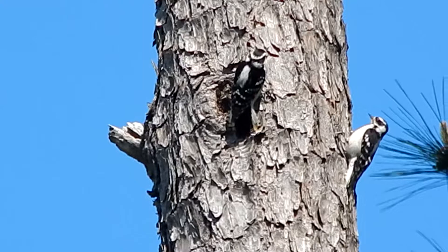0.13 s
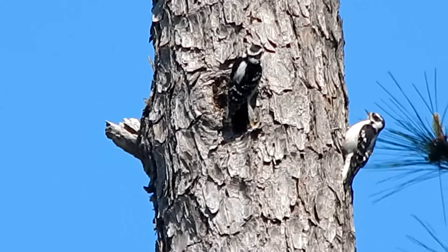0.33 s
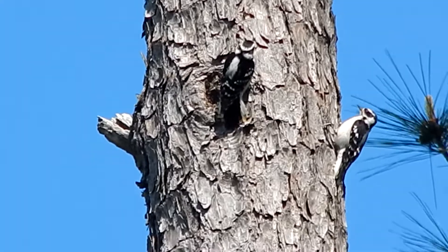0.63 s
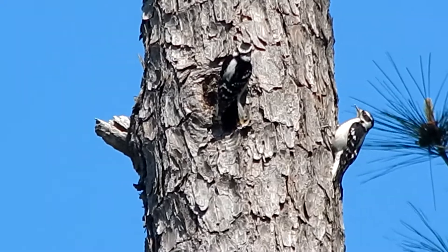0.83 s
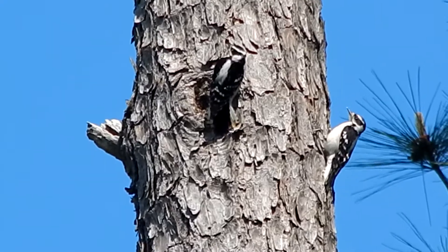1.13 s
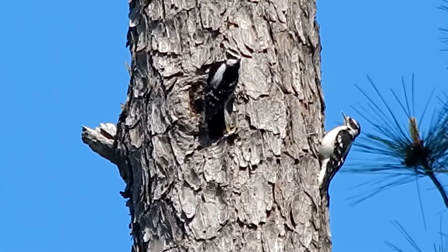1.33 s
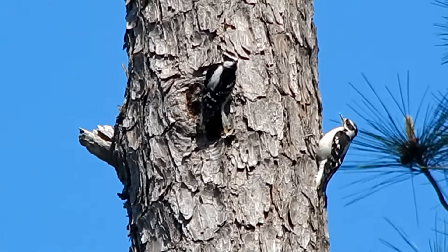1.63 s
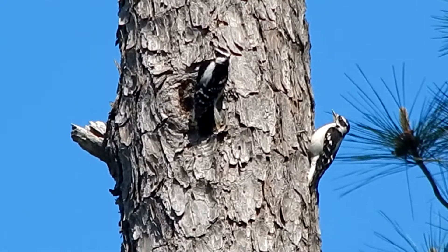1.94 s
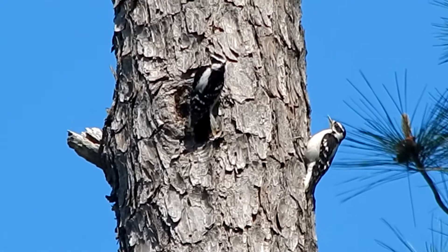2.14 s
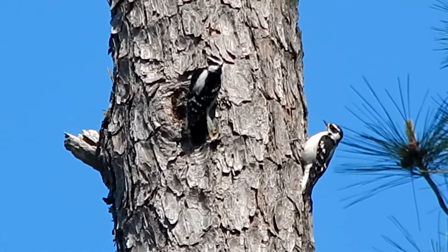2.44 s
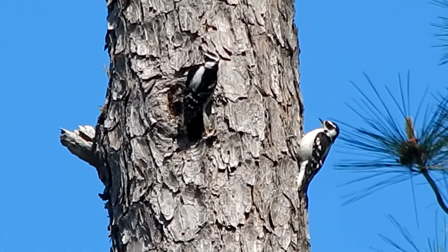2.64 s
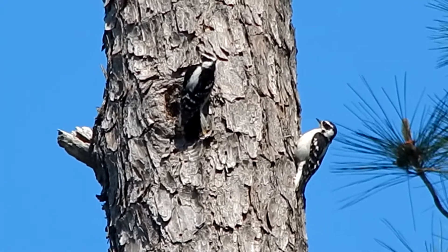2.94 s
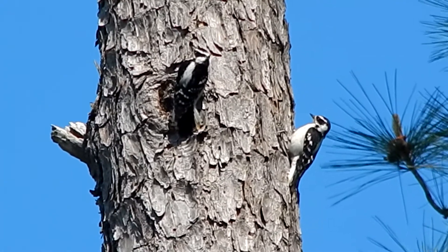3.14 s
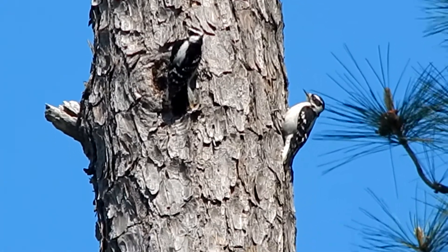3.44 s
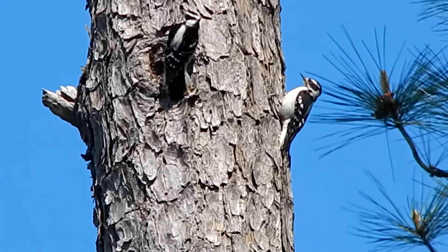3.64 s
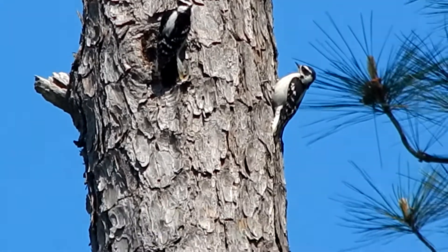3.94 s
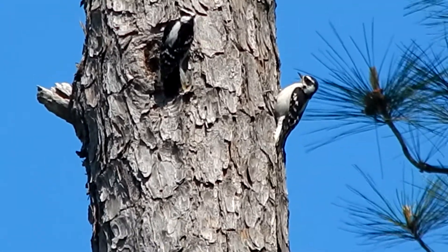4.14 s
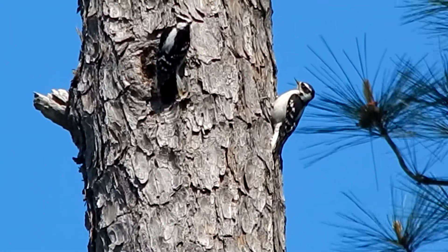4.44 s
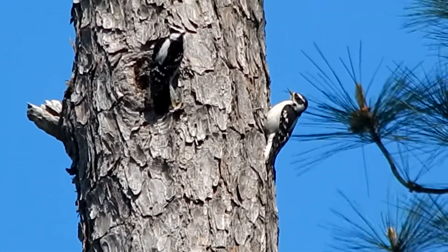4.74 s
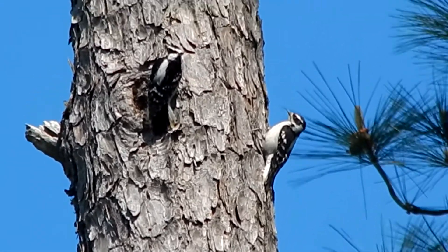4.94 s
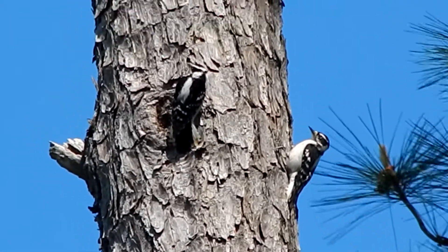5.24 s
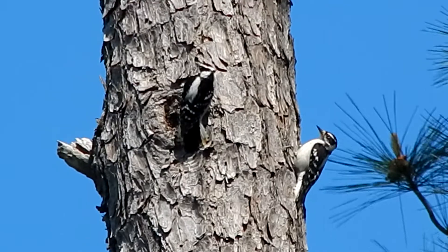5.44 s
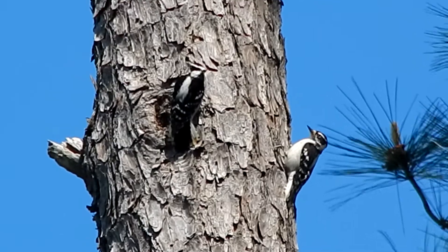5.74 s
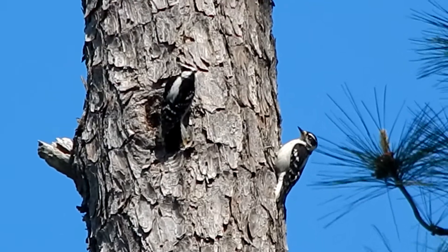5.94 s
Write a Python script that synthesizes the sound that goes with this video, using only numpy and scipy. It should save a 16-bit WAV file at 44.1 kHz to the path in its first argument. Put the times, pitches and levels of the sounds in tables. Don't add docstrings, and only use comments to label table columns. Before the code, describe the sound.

Far birds twitter on the left, then a nearer bird gives three pure descending whistles and about fourteen evenly spaced chips, each note ringing briefly among the trunks. Low, lumpy wind gusts knock at the microphone, especially on its left side as the chips begin. Afterwards come only scattered distant notes, one bright chirp, soft needle rustle, tiny twig ticks and a steady low rumble of traffic.

```python
import sys
import numpy as np
from scipy import signal
from scipy.fft import rfft, irfft, next_fast_len
from scipy.io import wavfile
from scipy.ndimage import uniform_filter1d

SR = 44100
rng = np.random.default_rng(int(sys.argv[2]) if len(sys.argv) > 2 else 0)


def volts_from_decibels(level):
    exponent = np.asarray(level, float) / 20
    return 10 ** exponent


def wav_out(sig):
    wavfile.write(sys.argv[1], SR, np.round(np.clip(np.atleast_2d(sig).T, -1, 1) * 32767).astype(np.int16))


N = 267819

# t/s from its start, f/Hz
WHISTLE_PITCH = [
    (0, 3560),
    (.08, 3310),
    (.11, 3365),
    (.155, 3215),
    (.172, 3060),
    (.2, 2650),
    (.248, 2050),
    (.334, 1880),
    (.49, 1590),
]
# t/s from its start, level/dB
WHISTLE_EFFORT = [(0, -32), (.006, -9), (.05, 2), (.09, -1), (.15, 0.5), (.193, 10), (.228, -3), (.29, -1),
                  (.49, -6)]
# t/s, level/dB, stretch after the bend [ratio], tilt of the shelf f/Hz
WHISTLES = [
    (0.624, -53.5, 1.13, 95),
    (1.543, -46, 1.06, 10),
    (2.265, -46, 0.99, 0),
]
# t/s from its start, f/Hz
CHIP_PITCH = [
    (-.003, 9000),
    (.003, 8100),
    (.0095, 4800),
    (.014, 4330),
    (.042, 3320),
    (.047, 2900),
    (.052, 2200),
    (.058, 1800),
    (.072, 1500),
]
# t/s from its start, level/dB about its section
CHIP_EFFORT = [(-.003, -20), (.002, -5), (.009, 2), (.012, -6), (.025, -11), (.03, .6), (.047, .6),
               (.053, -3.5), (.072, -12)]
# t/s, pace [ratio], level/dB of the high drop, of the middle slide, of the low end
CHIPS = [(2.9102, 1.004, -58, -43, -49), (3.0454, .984, -60, -46.5, -46), (3.1822, 1.004, -59, -45, -46),
         (3.3234, .974, -62, -44, -48), (3.4589, 1.065, -56, -43, -49), (3.6002, 1.004, -55, -42, -47),
         (3.7464, .984, -55, -40, -46), (3.8881, .953, -56, -41, -46), (4.0243, .994, -54, -42, -45),
         (4.1668, .994, -54, -40, -44), (4.3057, 1.014, -55, -42, -43), (4.4456, 1.025, -56, -42, -44),
         (4.5902, 1.014, -59, -40, -44), (4.7348, .994, -58, -41, -45)]
# multiple of the pitch, level/dB
OVERTONES = [(2, -21), (3, -35), (4, -19), (6, -28)]
# f/Hz, width f/Hz, level/dB
BEAK = [(8150, 650, 0), (12300, 700, -10)]
# f/Hz, left-right level/dB
EAR_TILT = [(1700, 1.5), (2500, -3), (3300, -5), (6000, -7)]

# t/s from its start, length t/s, from f/Hz, to f/Hz, level/dB
FAR_PHRASE = [
    (0, .024, 3750, 2750, -2),
    (.04, .02, 2500, 3250, -2),
    (.06, .026, 2520, 2950, 0),
]
# t/s, level/dB
FAR_PHRASE_TIMES = [
    (.285, -61),
    (.432, -54.5),
    (0.581, -54),
    (0.734, -63),
    (.885, -54),
]
# t/s, length t/s, from f/Hz, to f/Hz, level/dB
FAR_NOTES = [(1.16, .16, 3100, 2150, -56), (1.40, .06, 2600, 2050, -55), (1.48, .03, 3500, 3000, -60),
             (1.52, .06, 2600, 2000, -57), (1.68, .04, 2400, 2200, -59), (2.15, .05, 3400, 3250, -64),
             (2.33, .05, 2700, 2200, -61), (2.41, .05, 2400, 2450, -62), (2.57, .07, 3280, 3380, -58),
             (2.66, .07, 3350, 3300, -62), (2.76, .05, 2750, 2300, -61), (2.89, .04, 2400, 2700, -61),
             (3.19, .04, 3500, 2800, -56), (3.30, .07, 1900, 2200, -59), (3.40, .08, 2900, 2500, -61),
             (3.96, .08, 3100, 2700, -59), (5.07, .04, 1950, 2050, -57), (5.165, .09, 3150, 2500, -60),
             (5.25, .04, 2230, 2300, -61), (5.46, .04, 2600, 2750, -60), (5.72, .08, 2950, 2800, -63),
             (5.82, .05, 1900, 2150, -55), (5.93, .05, 3000, 2750, -61)]
# t/s, f/Hz, level/dB
CHIRP_UP = [
    (5.288, 1996, -63),
    (5.30, 2240, -53),
    (5.324, 2500, -58),
    (5.35, 2666, -40.5),
    (5.364, 2700, -52),
    (5.377, 2910, -38.5),
    (5.382, 3860, -46),
    (5.385, 4470, -49),
    (5.388, 5300, -66),
]
# t/s, f/Hz, level/dB
CHIRP_DOWN = [
    (5.378, 2950, -65),
    (5.385, 2550, -52),
    (5.392, 2340, -51),
    (5.408, 2260, -45),
    (5.417, 2050, -50),
    (5.424, 1850, -70),
]

# f/Hz, t60 t/s, level/dB
TRUNK_SCATTER = [(1770, 0.9, 2.5), (2500, 0.63, 2.5), (4000, 0.63, 0.7), (7200, 0.24, 11.5)]

# f/Hz, level/dB per Hz
NEEDLE_COLOUR = [(1500, -15), (4000, 2), (7000, 1), (10500, 3.3), (13000, 0.5), (15500, -14.5)]
# peak t/s, level/dB, swell t/s
PUFFS = [(1.56, -79.5, 0.012), (2.29, -76.5, 0.031), (2.94, -75, 0.014), (3.59, -77, 0.3), (4.37, -82, .3),
         (4.47, -79, 0.028), (4.92, -73.5, 0.52), (5.11, -86, 0.044), (5.39, -71.5, 0.065),
         (5.55, -77, 0.039), (5.79, -74, 0.039), (5.94, -72, 0.016), (6.05, -70, .04)]
# t/s, peak level/dB, left-right level/dB
TWIG_TICKS = [
    (4.1364, -52, -4.5),
    (4.8004, -47, -5),
    (4.8364, -47, -8.0),
    (4.8943, -51, -24),
    (5.5458, -49, -8.0),
    (5.7768, -47, -11),
    (5.9299, -47, 18),
]

# t/s, left level/dB, right level/dB
GUSTS = [(0, -58, -68), (.62, -62, -60), (.8, -41, -36), (1.0, -70, -53), (2.3, -66, -53),
         (2.471, -44.5, -50), (2.72, -35, -47), (2.98, -30.5, -39), (3.2, -37.5, -60), (3.35, -26, -62),
         (3.47, -55, -36), (3.6, -35.5, -39.5), (3.72, -25, -32), (3.98, -33.5, -44.5), (4.1, -47, -48),
         (4.35, -46, -54), (4.72, -40.5, -47), (4.85, -56, -60)]
# f/Hz, level/dB per Hz
BUFFET_COLOUR = [(12, -59), (20, -12.5), (49, 2), (92, -4.5), (151, -11), (357, -34), (387, -26),
                 (500, -55), (650, -83), (1100, -120)]
# t/s, peak level/dB, push 1 or pull -1, f/Hz
EDDIES_LEFT = [(0.753, -19, 1, 77), (0.771, -18, 1, 63), (0.7901, -16, 1, 95), (2.5215, -17, 1, 76.4),
               (2.779, -16, 1, 115), (2.888, -27, 1, 97), (2.974, -14.5, -1, 95), (3.0157, -14.5, -1, 94),
               (3.33, -20, 1, 109), (3.361, -19.5, 1, 85), (3.4169, -18.5, -1, 88), (3.463, -18, -1, 92),
               (3.4858, -4.5, 1, 121), (3.5383, -16, -1, 73), (3.7482, -19, -1, 86), (3.7753, -16, 1, 125),
               (3.8267, -20.5, 1, 93), (3.8603, -16, -1, 72.5), (3.896, -17.5, 1, 81), (3.937, -21, 1, 61),
               (3.9933, -22, 1, 70), (4.0354, -20, -1, 117)]
# t/s, peak level/dB, push 1 or pull -1, f/Hz
EDDIES_RIGHT = [
    (3.5194, -21, 1, 64),
    (3.5868, -20, -1, 75),
    (3.6696, -18, 1, 69),
    (3.7118, -27, -1, 104),
    (3.7354, -33, 1, 78),
]

# f/Hz, level/dB per Hz
AIR_COLOUR = [(22, -8.5), (50, -1.5), (115, 0.57), (160, -5.5), (250, -8.5), (500, -14), (800, -15),
              (1300, -20.5), (2000, -23.5), (2900, -26), (4200, -31.5), (5600, -36), (11500, -40.5),
              (15500, -45.5)]
# f/Hz, left-right correlation [-1..1]
AIR_LIKENESS = [(60, 1), (180, 0.95), (550, 0.79), (1650, 0.33), (4970, -0.33), (15000, 0.097)]
# f/Hz, left-right level/dB
AIR_LEAN = [(60, 2), (240, 1.5), (950, 0.92), (3770, -1.9), (15000, -0.26)]

# f/Hz, width f/Hz
NOTCHES = [
    (2497, 35),
    (7500, 90),
]


def singer():
    song = whistles() + chips()
    own_twinkle = np.array([drift(40), drift(40)])
    return song * volts_from_decibels(1.3 * drift(45) + 1.3 * own_twinkle)


def whistles():
    drop_hz, drop_s = 4800, .0058
    bend_s, release_s = .2, .02
    out = np.zeros((2, N))
    t, hz, db = learned(WHISTLE_PITCH, WHISTLE_EFFORT)
    hz = hz + drop_hz / (1 + (t / drop_s) ** 2)
    rounded = uniform_filter1d(hz, size=15, mode="nearest")
    hz = np.where(t > .05, rounded, hz)
    db = db - 15 * np.clip(1 - (t[-1] - t) / release_s, 0, 1)
    for s, level_db, stretch, tilt_hz in WHISTLES:
        tilted = hz + tilt_hz * np.sin(2 * np.pi * np.minimum(t / (1.1 * bend_s), 1))
        drawn_out = np.minimum(t, bend_s) + stretch * np.maximum(t - bend_s, 0)
        sing(out, np.transpose([s + drawn_out, tilted, level_db + db]), 0.1, OVERTONES, BEAK)
    return out * volts_from_decibels(2.3 * drift(30))


def chips():
    pan_db, head_turn_db = -1.5, 0.8
    out = np.zeros((2, N))
    t, hz, db = learned(CHIP_PITCH, CHIP_EFFORT)
    rounded = uniform_filter1d(hz, size=5, mode="nearest")
    hz = np.where(t > .02, rounded, hz)
    turns = rng.standard_normal(len(CHIPS))
    for (s, pace, *sections_db), turn in zip(CHIPS, turns):
        level_db = db + 0.1 + np.interp(t, [.006, .036, .053], sections_db)
        sing(out, np.transpose([s + pace * t, hz, level_db]), pan_db + head_turn_db * turn, OVERTONES, BEAK)
    return out


def learned(pitch, effort):
    s = np.arange(pitch[0][0], pitch[-1][0], .001)
    pitch_s, hz = np.transpose(pitch)
    effort_s, db = np.transpose(effort)
    return s, np.exp(np.interp(s, pitch_s, np.log(hz))), np.interp(s, effort_s, db)


def sing(out, rows, pan_db, overtones, beak):
    s, hz, level_db = np.transpose(rows)
    i = np.arange(int(s[0] * SR), int(s[-1] * SR))
    glided = np.exp(np.interp(i / SR, s, np.log(hz)))
    hz = uniform_filter1d(glided, size=64, mode="nearest")
    phase = 2 * np.pi * (np.cumsum(hz) / SR + rng.random())
    tone = np.sin(phase)
    for multiple, share_db in overtones:
        overtone_hz = multiple * hz
        opening = 0
        for centre_hz, width_hz, top_db in beak:
            opening = opening + volts_from_decibels(top_db) / (1 + ((overtone_hz - centre_hz) / (width_hz / 2)) ** 2)
        audible = overtone_hz < SR / 2
        tone = tone + volts_from_decibels(share_db) * opening * audible * np.sin(multiple * phase)
    fade = np.clip(np.minimum(i - i[0], i[-1] - i) / 90, 0, 1)
    level = np.sqrt(2) * volts_from_decibels(np.interp(i / SR, s, level_db))
    out[:, i] += level * fade * tone * sides(pan_db + at_hz(EAR_TILT, hz))


def neighbours():
    pan_db, spread_db = 8, 1.8
    far, near = np.zeros((2, N)), np.zeros((2, N))
    for s, level_db in FAR_PHRASE_TIMES:
        for after, length, from_hz, to_hz, note_db in FAR_PHRASE:
            sing(far, glide(s + after, length, from_hz, to_hz, level_db + note_db), 11, [], [])
    places = rng.standard_normal(len(FAR_NOTES))
    for note, place in zip(FAR_NOTES, places):
        sing(far, glide(*note), pan_db + spread_db * place, [], [])
    for voice in CHIRP_UP, CHIRP_DOWN:
        sing(near, voice, 1.5, [(2, -13), (3, -21)], [(4400, 800, 0), (8000, 1800, -5)])
    blur = rng.standard_normal((2, 900)) * np.hanning(900) / 45
    far = .8 * far + 1.05 * signal.fftconvolve(far, blur, axes=1)[:, :N]
    return far * volts_from_decibels(2.5 * drift(88)), near


def glide(s, length, from_hz, to_hz, level_db):
    part = np.array([0, .25, .75, 1])
    hz = from_hz * (to_hz / from_hz) ** part
    return np.transpose([s + length * part, hz, level_db - 14 * np.array([1, 0, 0, 1])])


def woods(x):
    t = np.arange(SR) / SR
    tail = 0
    for hz, t60, level_db in TRUNK_SCATTER:
        band = signal.butter(2, [hz / 1.25, hz * 1.25], "band", fs=SR, output="sos")
        noise = signal.sosfilt(band, rng.standard_normal((2, SR)))
        tail = tail + noise * volts_from_decibels(level_db - 60 * t / t60)
    clumps = volts_from_decibels([1.5 * drift(25, count=SR) for side in range(2)])
    tail = tail * np.clip(t / .008, 0, 1) * clumps
    tail = tail / np.sqrt(np.sum(tail ** 2) / 2)
    return signal.fftconvolve(x.mean(axis=0, keepdims=True), tail, axes=1)[:, :N]


def needles():
    grain_db = 1.7 * np.minimum(rng.exponential(1, (2, N)), 5)
    grains = rng.standard_normal((2, N)) * volts_from_decibels(grain_db)
    out = coloured(NEEDLE_COLOUR, grains) * breeze() * volts_from_decibels(9.0 + 2.44 * drift(20.5)) * sides(-15.0)[:, None]
    die_away = volts_from_decibels(-60 * np.arange(200) / SR / 0.0091)
    for s, peak_db, pan_db in TWIG_TICKS:
        snap = coloured(NEEDLE_COLOUR, rng.standard_normal(N))[:200] * die_away
        at = int(s * SR)
        out[:, at:at + 200] += volts_from_decibels(peak_db - 4.5) * snap * sides(pan_db)[:, None]
    return out


def breeze():
    stir_db, grows_db_per_s, puff_dies_s = -83.5, 0.5, 0.05
    t = np.arange(N) / SR
    power = volts_from_decibels(stir_db + grows_db_per_s * t) ** 2
    for s, db, swell_s in PUFFS:
        power = power + volts_from_decibels(db) ** 2 * np.exp(-np.abs(t - s) / np.where(t < s, swell_s, puff_dies_s))
    return np.sqrt(power)


def wind():
    s, *levels = np.transpose(GUSTS)
    t = np.arange(N) / SR
    gust_db = [np.interp(t, s, level) + 3.3 * np.clip(drift(22.4), -2, 1.5) for level in levels]
    out = volts_from_decibels(gust_db) * coloured(BUFFET_COLOUR, rng.standard_normal((2, N)))
    for port, eddies in enumerate([EDDIES_LEFT, EDDIES_RIGHT]):
        for s, peak_db, push, hz in eddies:
            swing = eddy(hz)
            at = int((s - .03) * SR)
            out[port, at:at + len(swing)] += np.sign(push) * volts_from_decibels(peak_db - 3.5) * swing
    return out


def eddy(hz):
    t = np.arange(-.03, .05, 1 / SR)
    width = np.where(t < 0, .28, .75) / hz
    cycles = np.where(t < 0, hz * t, np.log1p(0.93 * hz * np.abs(t)) / 0.85)
    return np.cos(2 * np.pi * cycles) * np.exp(-(t / width) ** 2 / 2)


def open_air():
    size = next_fast_len(N)
    hz = np.fft.rfftfreq(size, 1 / SR)
    mid, side = rfft(rng.standard_normal((2, size)))
    alike = np.clip(at_hz(AIR_LIKENESS, hz), -1, 1)
    pair = np.sqrt(1 + alike) * mid + np.sqrt(1 - alike) * side * [[1], [-1]]
    noise = irfft(pair * sides(at_hz(AIR_LEAN, hz)), size)[:, :N]
    return volts_from_decibels(-44.05 + 1.25 * drift(7.2)) * coloured(AIR_COLOUR, noise)


def at_hz(points, hz):
    p = np.array(points)
    return np.interp(np.log(np.maximum(hz, 1)), np.log(p[:, 0]), p[:, 1])


def rms_one(x):
    return x / np.sqrt(np.mean(x ** 2) + 1e-20)


def drift(rate, count=N):
    knots_per_s = 200
    knots = rng.standard_normal(int(N / SR * knots_per_s) + 400)
    r = np.exp(-2 * np.pi * min(rate, 90) / knots_per_s)
    slow = signal.lfilter([1], [1, -2 * r, r * r], knots)[300:]
    return np.interp(np.arange(count) * knots_per_s / SR, np.arange(len(slow)), rms_one(slow))


def coloured(spectrum, x):
    size = next_fast_len(N)
    gain = volts_from_decibels(at_hz(spectrum, np.fft.rfftfreq(size, 1 / SR)))
    return rms_one(irfft(rfft(x, size) * gain, size)[..., :N])


def sides(pan_db):
    return np.array([volts_from_decibels(pan_db / 2), volts_from_decibels(-pan_db / 2)])


def scene():
    song = singer()
    far, near = neighbours()
    scatter = woods(volts_from_decibels(-7.0) * song + volts_from_decibels(-6) * far + volts_from_decibels(-13.0) * near)
    birds = song + volts_from_decibels(-2.5) * far + near
    return birds + scatter + needles() + wind() + open_air()


def roll_off(x):
    return signal.sosfilt(signal.butter(12, 15860, fs=SR, output="sos"), x)


def record(dry):
    start_s = .082
    for hz, width_hz in NOTCHES:
        dry = signal.lfilter(*signal.iirnotch(hz, hz / width_hz, SR), dry)
    mix = dry * (np.arange(N) >= start_s * SR)
    return roll_off(mix)


dry = scene()
out = record(dry)
wav_out(out)
```